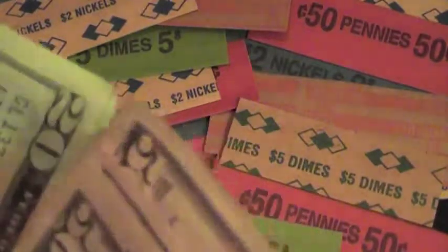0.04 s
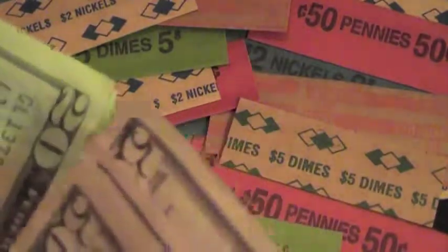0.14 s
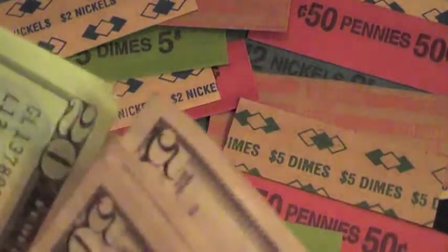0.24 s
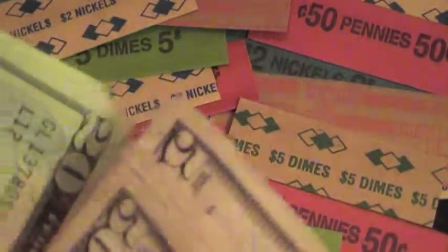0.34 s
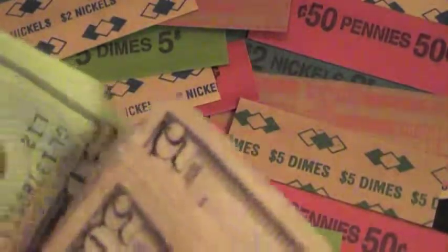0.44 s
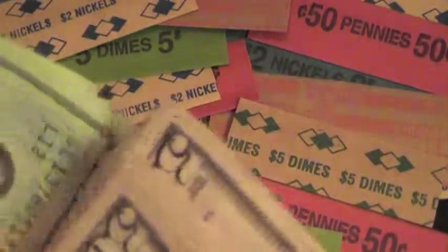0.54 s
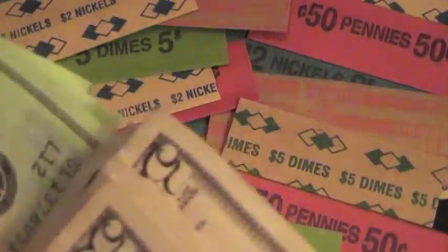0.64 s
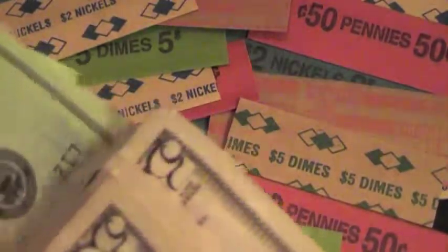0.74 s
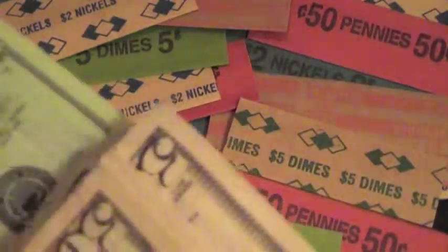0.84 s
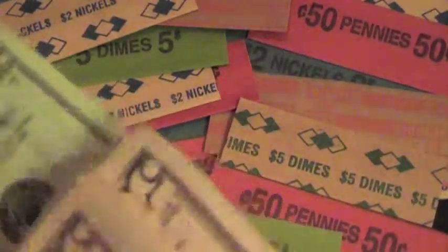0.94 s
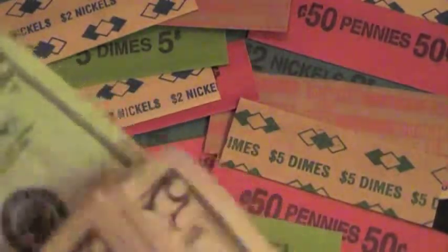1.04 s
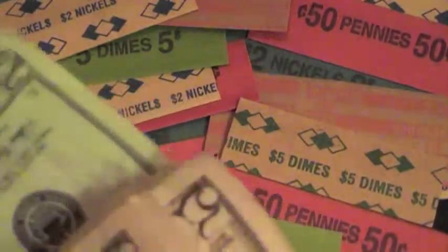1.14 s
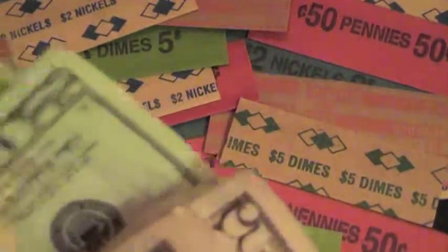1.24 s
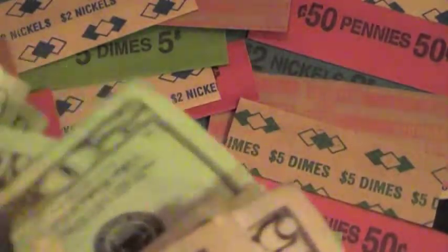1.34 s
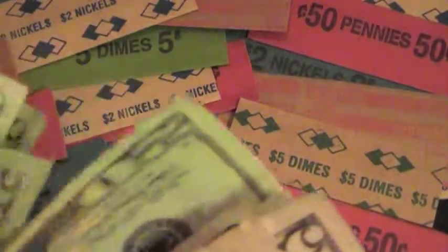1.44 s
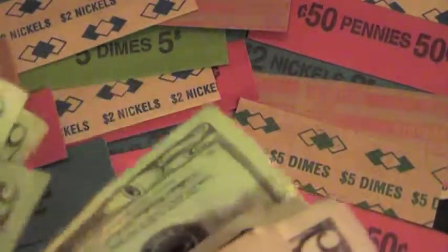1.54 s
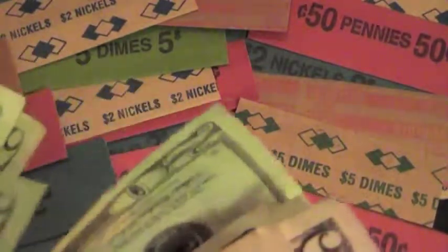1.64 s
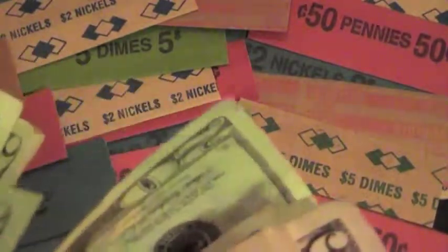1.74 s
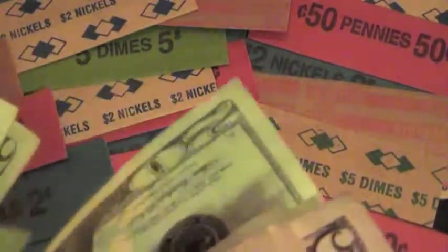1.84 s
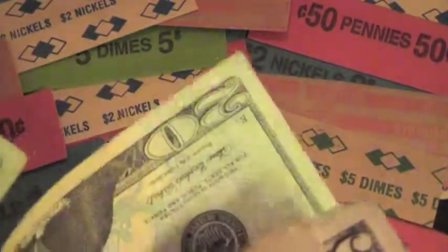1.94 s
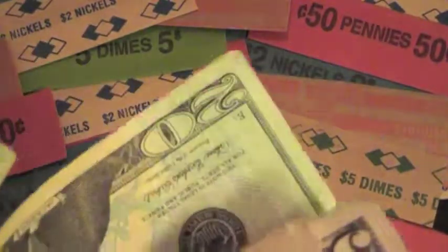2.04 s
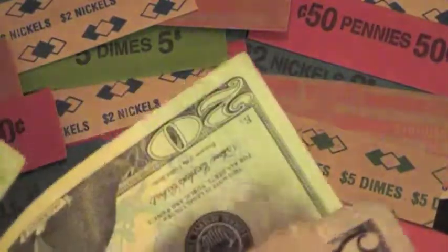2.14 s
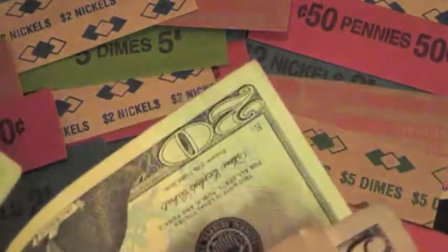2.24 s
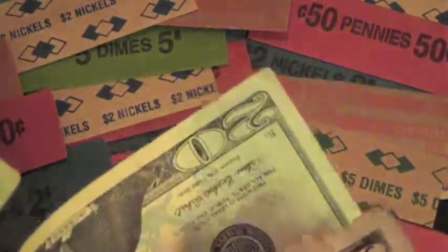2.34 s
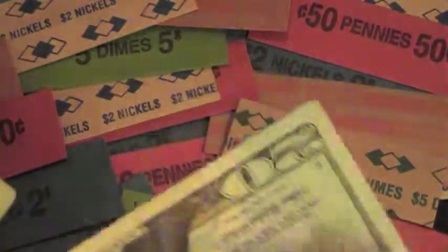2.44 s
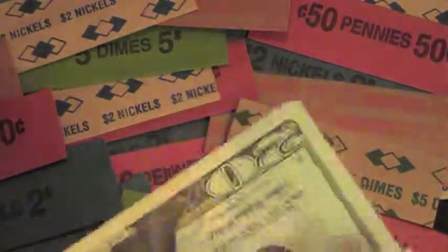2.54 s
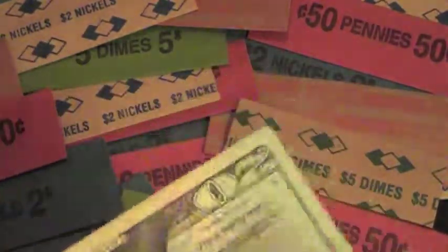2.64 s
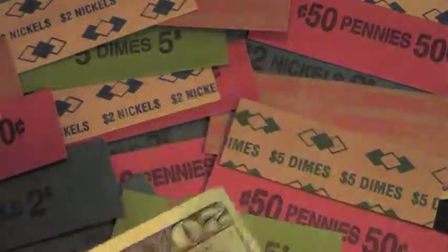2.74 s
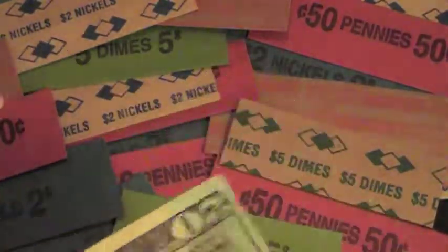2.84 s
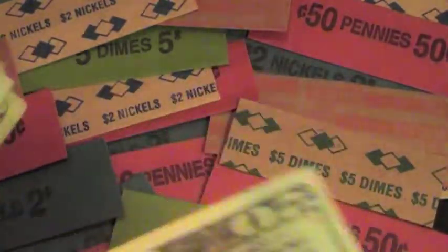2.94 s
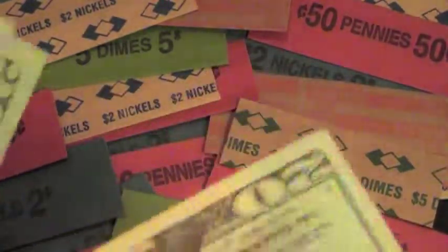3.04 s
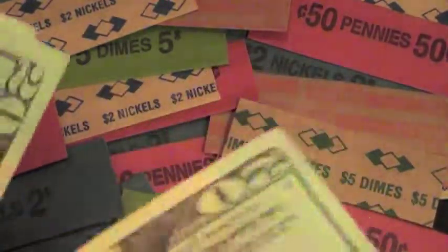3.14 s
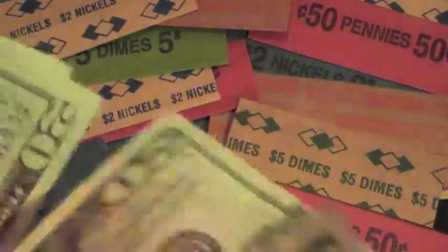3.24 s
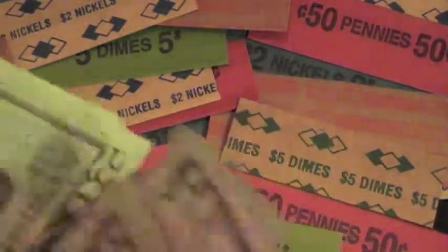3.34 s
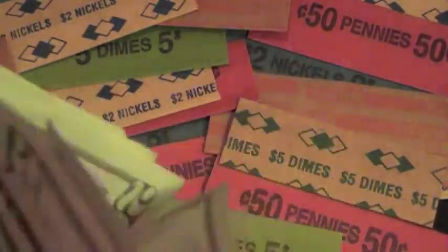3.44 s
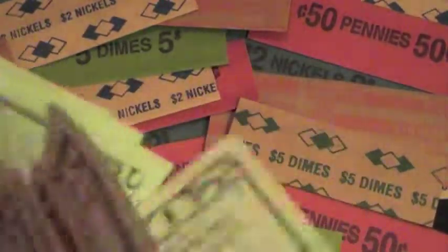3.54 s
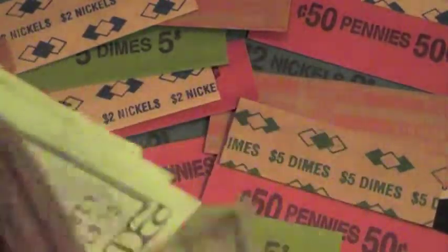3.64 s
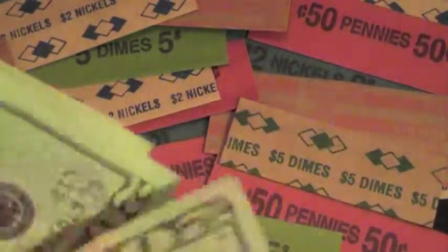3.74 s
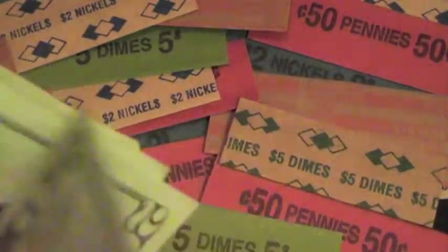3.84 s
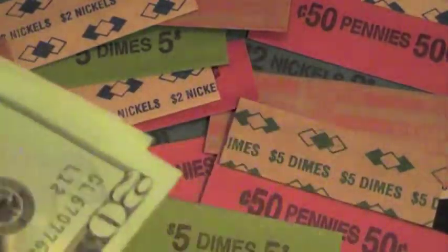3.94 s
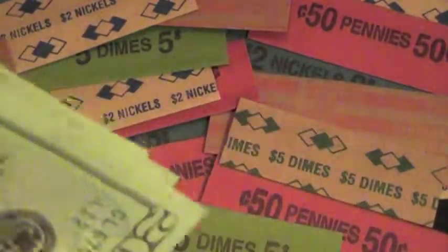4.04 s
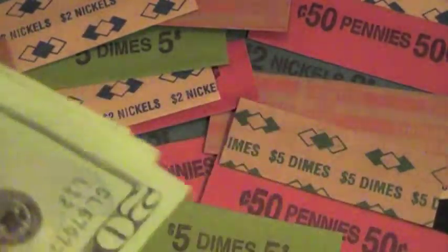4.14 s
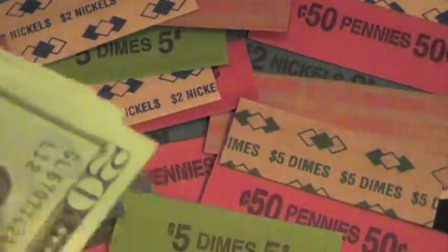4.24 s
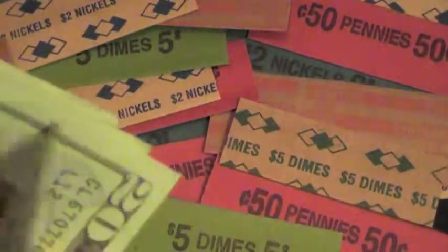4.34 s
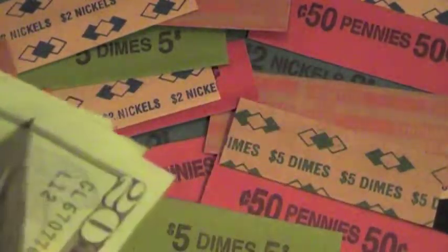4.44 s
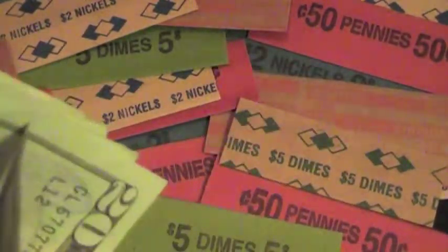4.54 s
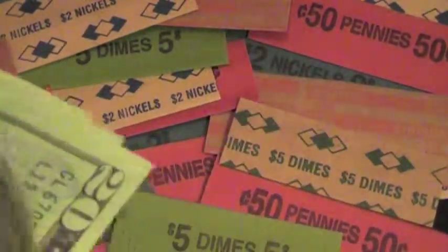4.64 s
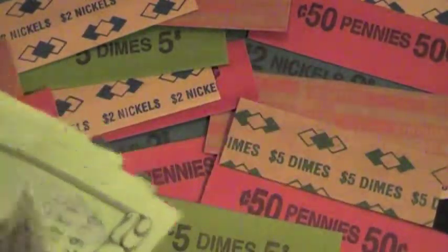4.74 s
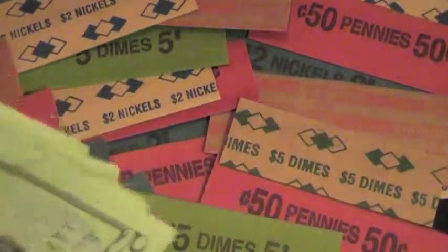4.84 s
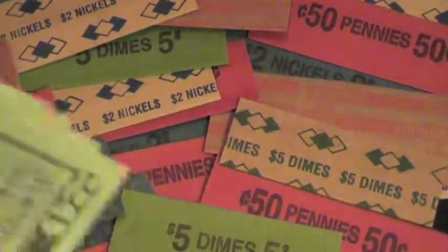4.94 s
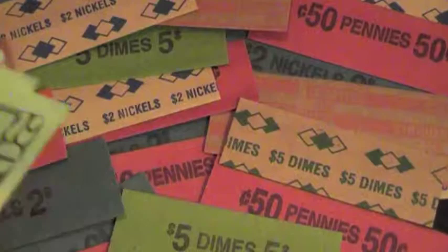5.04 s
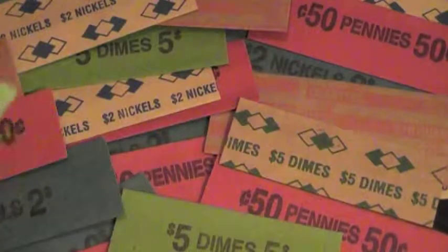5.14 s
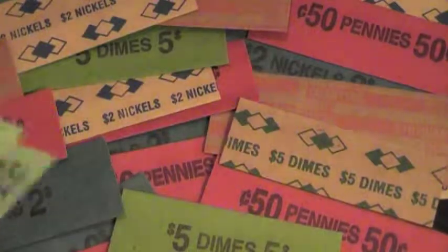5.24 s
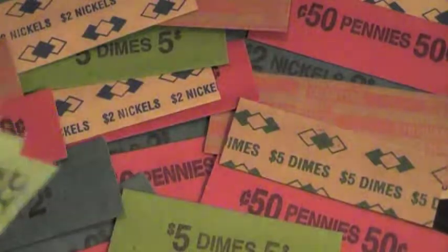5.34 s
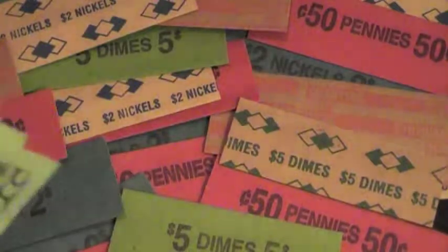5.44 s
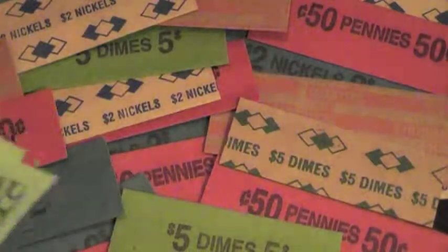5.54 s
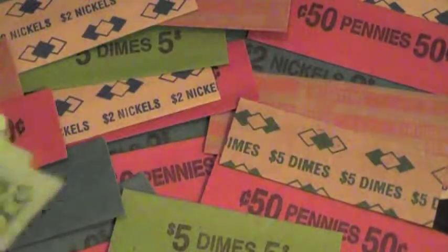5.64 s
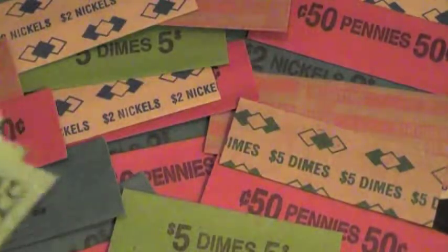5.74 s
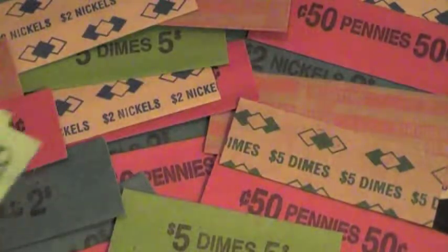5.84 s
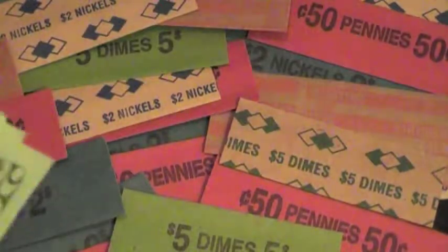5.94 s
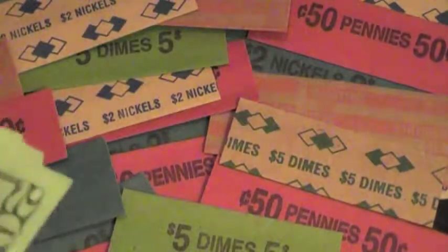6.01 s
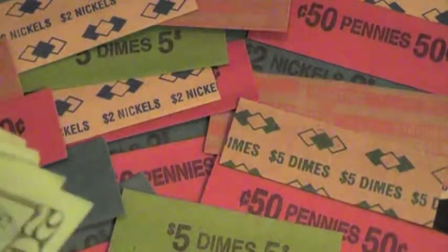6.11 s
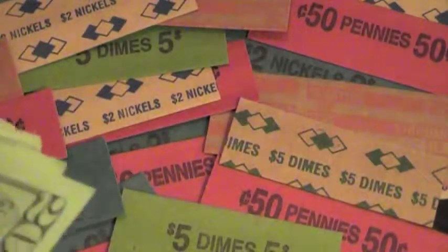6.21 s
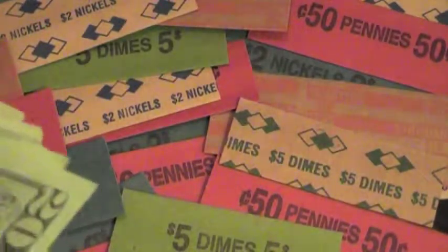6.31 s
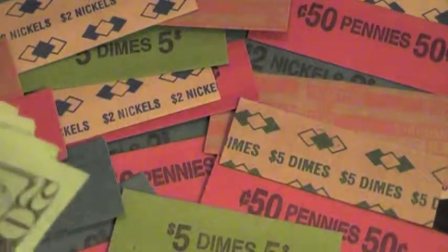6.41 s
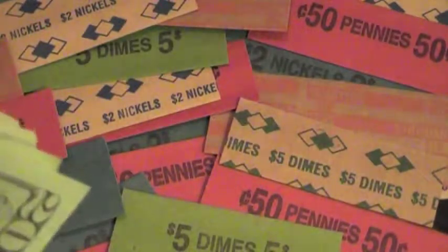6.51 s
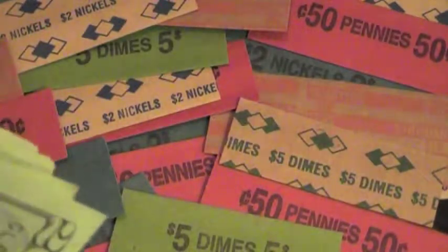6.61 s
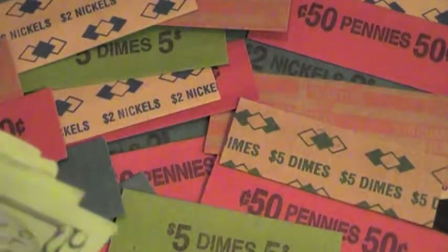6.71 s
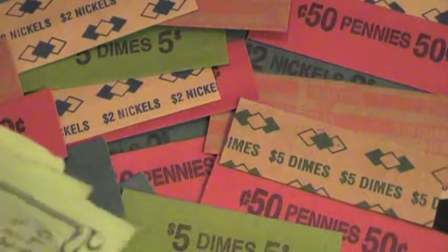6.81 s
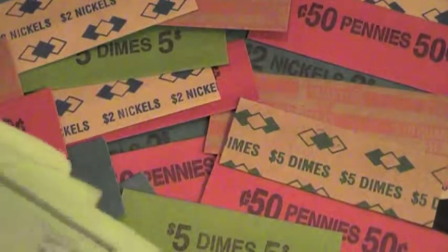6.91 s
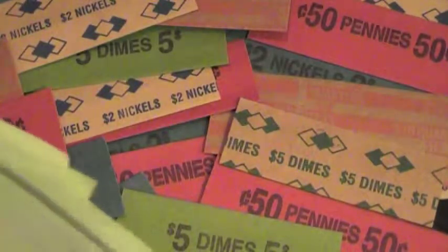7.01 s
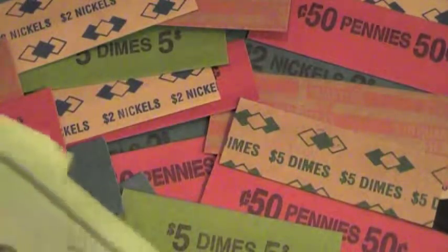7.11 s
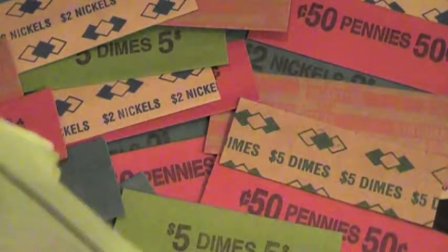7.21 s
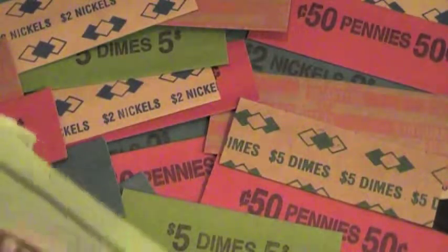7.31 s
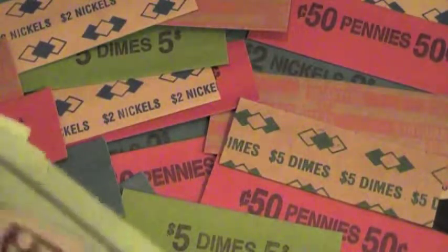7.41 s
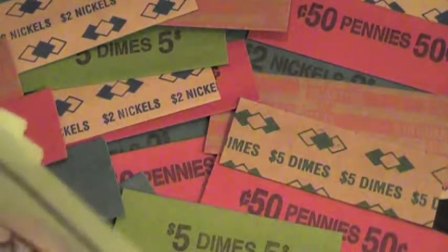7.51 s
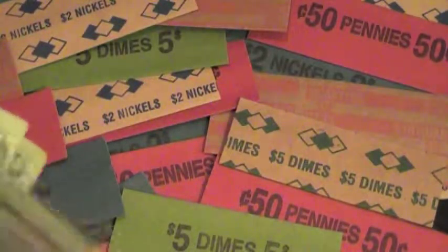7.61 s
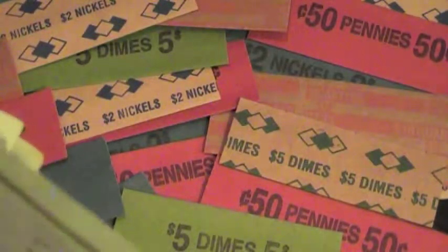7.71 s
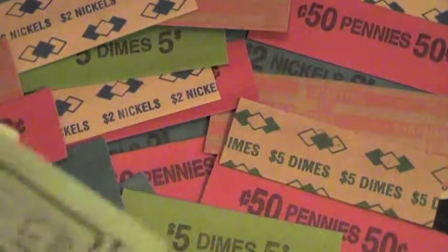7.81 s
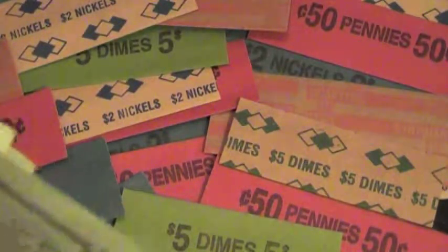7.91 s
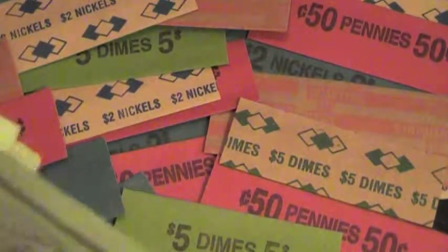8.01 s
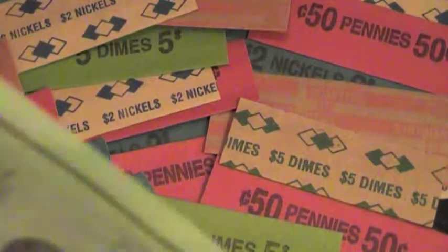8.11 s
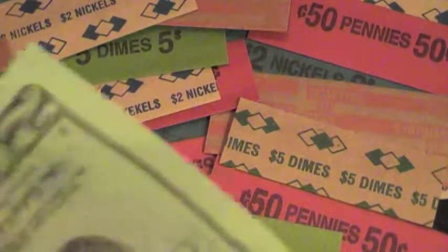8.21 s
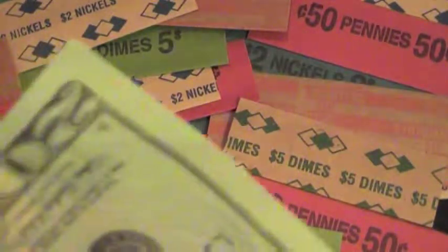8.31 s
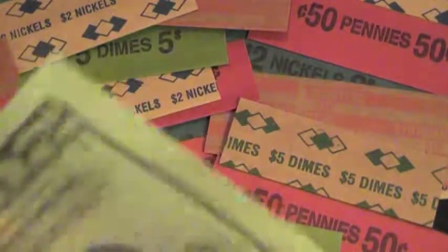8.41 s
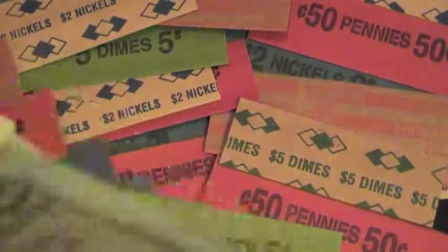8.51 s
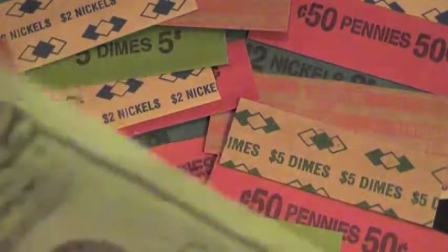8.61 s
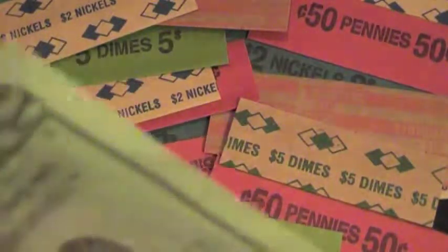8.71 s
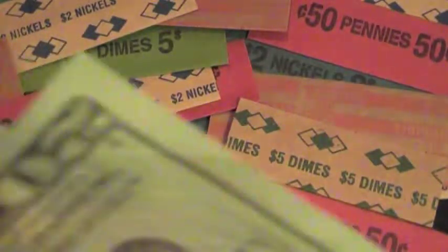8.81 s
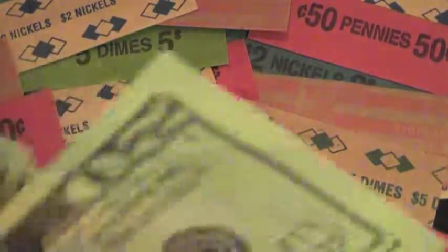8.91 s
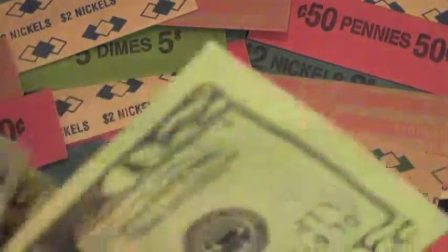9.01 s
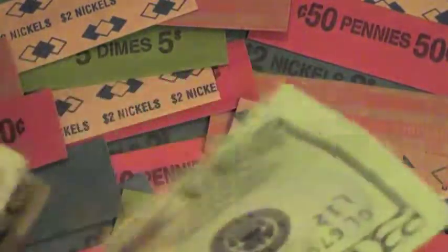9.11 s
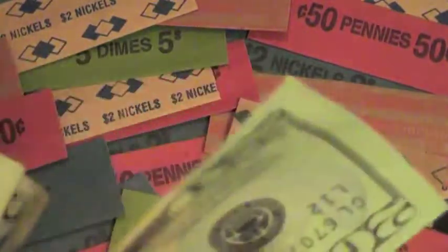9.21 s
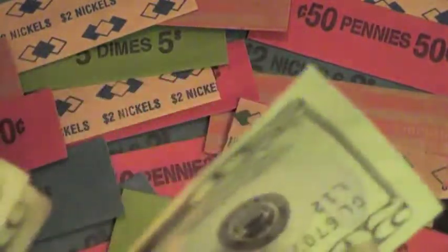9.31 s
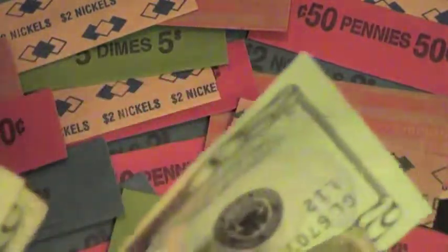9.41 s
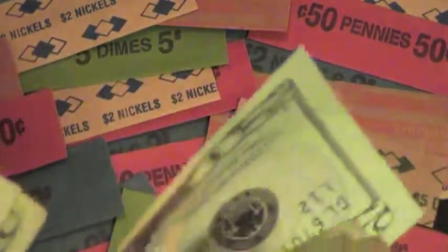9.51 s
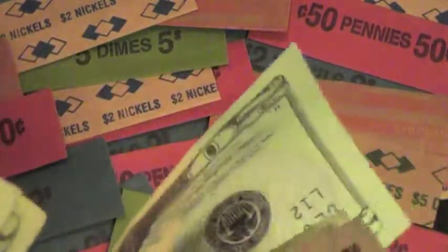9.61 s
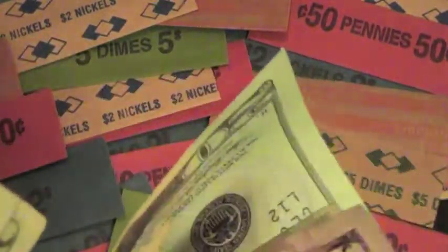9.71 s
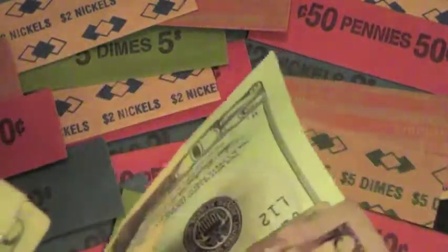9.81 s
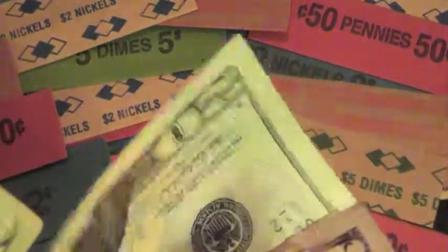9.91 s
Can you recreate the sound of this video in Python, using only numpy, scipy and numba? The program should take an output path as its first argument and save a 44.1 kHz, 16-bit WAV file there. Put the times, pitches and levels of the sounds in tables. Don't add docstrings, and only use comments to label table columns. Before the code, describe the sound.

Banknotes are peeled and pulled one by one, loud papery pops breaking up quieter hissing rubs, in a furnished room with faint hum.

```python
import sys
import numpy as np
from scipy import signal
from scipy.fft import rfft, irfft, next_fast_len
from scipy.io import wavfile
from scipy.ndimage import uniform_filter1d
from numba import njit

SR = 44100
rng = np.random.default_rng(int(sys.argv[2]) if len(sys.argv) > 2 else 0)


def voltage_ratio(level):
    return 10 ** (np.asarray(level, float) / 20)


def generate_wav(sig):
    pcm = np.round(np.clip(np.atleast_2d(sig).T, -1, 1) * 32767).astype(np.int16)
    wavfile.write(sys.argv[1], SR, pcm)


N = 439236

# start_s, sheet_level_db, fall_s (per 20 dB), hiss_above_sheet_db
FLICKS = [(3.122, -36.5, 0.05, -12), (3.96, -48, 0.07, -1.5), (4.15, -45, 0.15, -1.5),
          (4.451, -42.5, 0.07, -1.5), (4.661, -48.5, 0.14, -1.5), (5.333, -40, 0.13, 0.5),
          (6.137, -43, 0.08, 1), (6.64, -48, 0.24, 0.5), (7.588, -38, 0.2, -14.5),
          (7.718, -42.5, 0.15, -3.5), (7.66, -50, .5, 0), (8.846, -42, 2, -7), (9.552, -31, 0.15, -4.5),
          (9.692, -34, 0.0223, -7.5), (9.947, -29.5, -1, -11.5)]
FLICK_RISE_S = 0.014
# peak_s, sheet_level_db, rise_s (per 20
# dB), fall_s (per 20 dB), hiss_above_sheet_db
DRAGS = [(0.043, -46, 0.0367, 0.0217, -3), (.106, -56, 0.069, .04, -2), (.659, -60, 0.43, .4, 2),
         (0.956, -44, 0.257, 0.11, -3), (1.3, -50.5, 0.21, 0.35, 4.5), (1.469, -36.5, 0.25, 0.29, -3.5),
         (1.542, -32.5, 0.17, 0.081, -12), (1.6, -40.5, 0.127, 0.18, -11),
         (1.802, -37.5, 0.35, 0.059, -11), (1.89, -38, .05, .3, -19), (1.962, -33, 0.27, .2, -10),
         (1.997, -24.5, 0.087, .1, -8), (2.04, -30, 0.1, 0.11, 4), (2.083, -26.5, .15, 0.078, -16),
         (2.131, -37.5, .1, 0.237, -18), (2.265, -33, 0.063, 0.1495, -7),
         (2.456, -34.5, 0.191, 0.25, -10), (2.485, -31, 0.044, 0.04, -2), (2.54, -37, .1, 0.083, -10),
         (2.682, -45, 0.44, 0.072, -8), (2.895, -43.5, 0.3, .4, -1.5), (3.052, -39, 0.2, 0.21, -4.5),
         (3.207, -39, 0.079, 0.084, -12.5), (3.38, -46, 0.396, 0.675, -8),
         (3.49, -44, 0.37, 0.14, 3.5), (3.79, -44.5, 0.13, 0.12, -3), (4.2, -52, 0.054, 0.37, -5.5),
           (4.005, -50, .1, .1, 0), (4.428, -51, .05, .1, 0), (4.857, -41.5, 0.062, 0.067, 1),
           (4.958, -43.5, 0.164, 0.215, 4), (5.086, -36.5, 0.09, 0.287, 10),
           (5.196, -40.5, 0.412, 0.12, 5.5), (5.39, -45.5, 0.11, 0.084, 4.5),
           (5.593, -52, 0.23, 0.11, -2.5), (5.775, -48.5, 0.16, 0.038, -2), (5.881, -49, 0.096, 0.155, 1.5),
           (5.96, -54, 0.257, 0.172, 4.5), (6.19, -44, 0.093, 0.062, -3), (6.306, -50, 0.097, 0.16, 4.5),
           (6.499, -47.5, 0.2, 0.089, .5), (6.763, -52.5, 0.04, 0.54, 0), (7.004, -45.5, 0.12, 0.119, 4.5),
           (7.142, -52.5, 0.063, 0.59, 4.5),
         (7.445, -37, 0.059, 0.15, -4), (7.475, -43.5, 0.14, 0.49, 1), (7.872, -43.5, 0.096, 0.125, 1.5),
           (8.249, -37, 0.16, 0.36, -5), (8.405, -38.5, 0.32, 0.022, -6), (8.549, -43.5, 0.072, .3, -9),
           (8.66, -43, 0.345, 0.11, 0), (8.694, -34.5, 0.049, 0.055, -8.5), (8.932, -38, 0.3, 0.23, -5),
           (8.968, -33, 0.17, 0.207, -14.5), (9.057, -42, 0.098, 0.113, -7.5),
           (9.179, -33, 0.056, 0.31, -11.5), (9.235, -31, 0.16, 0.132, -17), (9.357, -41.5, 0.14, 0.53, -4),
           (9.427, -36.5, 0.28, 0.13, -10), (9.824, -43, 0.044, 0.03, -9)]
# start_s, length_s, sheet_level_db, hiss_above_sheet_db
SWIPES = [(2.006, .003, -19, -14), (2.474, .008, -31.5, 0), (2.49, 0.0064, -25, -7.5),
          (2.508, .005, -29.5, -8), (3.724, 0.042, -34, -2), (3.946, 0.015, -40, 1.5),
          (4.135, 0.02, -36.5, 1.5), (4.447, .012, -44, -3), (5.066, .05, -39, 8), (5.18, .026, -39, 7.5),
          (5.325, .01, -40.5, 2), (6.091, .004, -59, 4), (6.145, 0.0054, -34, 2.5), (6.169, .03, -44.5, -1),
          (7.408, .03, -33.5, -2.5), (8.232, 0.028, -36.5, -6.5), (8.69, 0.0096, -28.5, -10),
          (9.228, .015, -31, -14), (9.814, 0.023, -42.5, -9.5)]
SWIPE_RISE_S, SWIPE_FALL_S = 0.012, 0.017
LINGER_DB, LINGER_S = -24.5, 0.22
HELD_DB, HELD_HISS_DB = -72, 8
# middle_s, length_s
PAUSES = [(1.853, 0.0432), (2.227, 0.0576), (2.594, 0.058), (3.697, 0.055), (4.91, 0.0423), (5.265, 0.1),
          (5.796, 0.022), (8.06, 0.149), (8.474, 0.097), (8.787, 0.08), (9.119, 0.061), (9.325, 0.048),
          (2.36, .03), (3.89, .07), (4.085, .05), (6.07, .06)]
PAUSE_DB, PAUSE_HISS_SHARE = -6.5, 0.5
PINNED_S, PINNED_DB = 0.056, -5.5

# time_s, pitch_hz
TAUT_PITCH = [(0, 1840), (.55, 1480), (1.1, 1620), (3.6, 2100), (3.75, 2000), (4.1, 2520), (4.3, 2300),
              (4.46, 1601), (4.86, 1990), (5.1, 2400), (5.7, 2200), (6.15, 2200), (6.4, 2130), (6.7, 1900),
              (7.2, 2200)]
# time_s, pitch_hz
BENT_PITCH = [
    [(1.25, 1570), (1.298, 1870), (1.34, 1360), (1.586, 1720), (1.692, 2210), (1.766, 1470), (1.85, 1350)],
    [(1.86, 1270), (2.066, 1790), (2.328, 1510), (2.358, 1250), (2.47, 1730), (2.572, 1550), (2.6, 1210)],
    [(2.8, 1910), (2.928, 2110), (2.998, 1460), (3.252, 1010), (3.338, 2160), (3.378, 1570), (3.45, 2340)],
    [(7.36, 2700), (7.454, 2660), (7.556, 1680), (7.818, 1430), (7.846, 1920), (7.916, 2300), (7.95, 1640)],
    [(8.12, 1410), (8.232, 2080), (8.3, 1250), (8.398, 1670), (8.478, 1090), (8.524, 2080), (8.78, 1270)],
    [(8.8, 1300), (8.86, 1350), (8.916, 2090), (8.988, 2210), (9.03, 1640), (9.182, 1620), (9.3, 994)],
    [(9.33, 2350), (9.542, 1490), (9.636, 1750), (9.662, 1470), (9.748, 1720), (9.874, 1580), (9.9, 1300)],
]
TAUT_DB_PER_HISS_DB = 0.1
# time_s, pitch_hz
CONTACT_PITCH = [
    [(0.0, 7320), (0.554, 7280), (0.588, 8680), (0.834, 6420), (1.118, 5600), (1.2, 7940)],
    [(1.25, 7990), (1.322, 8700), (1.382, 8560), (1.696, 5010), (1.752, 6460), (1.85, 6690)],
    [(1.9, 6580), (2.208, 5070), (2.238, 8250), (2.388, 6040), (2.504, 8070), (2.6, 5740)],
    [(2.65, 7530), (2.684, 5430), (2.802, 7650), (3.138, 5580), (3.528, 7410), (3.6, 6910)],
    [(3.7, 8450), (3.892, 6430), (3.946, 8900), (4.066, 5460), (4.08, 6960), (4.7, 7510)],
    [(4.75, 8170), (4.886, 7530), (5.156, 8870), (5.288, 6050), (5.388, 8700), (5.45, 6910)],
    [(5.5, 7330), (5.9, 6450), (5.938, 9480), (6.062, 5870), (6.094, 9570), (6.35, 5870)],
    [(6.4, 5880), (6.556, 7760), (6.632, 5160), (6.664, 5910), (7.208, 7630), (7.3, 6970)],
    [(7.36, 5680), (7.5, 5780), (7.556, 8680), (7.736, 5600), (7.816, 7620), (7.97, 6130)],
    [(8.12, 6400), (8.2, 8530), (8.316, 4630), (8.34, 6410), (8.728, 8950), (8.78, 6650)],
    [(8.82, 8220), (8.88, 8820), (8.968, 8840), (9.022, 5630), (9.082, 7370), (9.3, 5120)],
    [(9.34, 6660), (9.446, 5590), (9.546, 6480), (9.626, 5930), (9.738, 6510), (9.96, 6120)],
]
# pitch_hz, level_db (per Hz)
SHEET_COLOUR = [(150, -29), (400, -3.5), (800, 0.5), (1500, -2), (3000, -2), (4400, -7), (7000, -35)]
FIBRE_COLOUR = [(2500, -1.5), (4500, -1.5), (5800, -0.5), (7000, -4), (8900, -1.5), (11500, -5),
                (13500, -14), (16500, -14.5)]

# snap_s, peak_db, patch_pitch_hz, crack_above_peak_db
TIGHT = [(.602, -29, 1710, -5.5), (1.0308, -30, 3180, -14.5), (1.0948, -27, 1210, -23),
         (1.5463, -9.5, 1620, -13.5), (1.6742, -1.5, 2240, -35), (2.0042, -8, 2500, 7),
         (2.0145, 1.5, 1600, -26.5), (2.043, 0.5, 2820, -1), (3.052, -5, 1240, -12.5),
         (3.1872, -21, 1370, -21.5), (4.6643, -30.5, 1820, -6.5), (6.8592, -23.5, 3807, -2),
         (6.8765, -34, 1580, 1.5), (7.711, -27, 1300, -25), (7.7177, -20, 1230, 3.5),
         (7.884, -19, 1660, -5), (8.3068, -12.5, 2320, -16), (8.3779, -16.5, 2060, -20),
         (8.5224, -28.5, 2250, -13), (8.8342, -20.5, 828, -6.5), (8.9405, -17, 2300, -23),
         (8.9441, -3, 2114, 2), (7.4055, 0, 2494, -13), (8.962, -6.5, 2700, -7.5),
         (9.1415, -29.5, 1230, -6.5), (9.1897, -15, 2410, -36), (9.2225, -1, 1900, -9),
         (9.353, -6.5, 2600, -7.5), (9.552, -7, 1296, -4.5), (9.6278, -13, 1760, -33.5),
         (9.6554, -19.5, 1297, -26), (9.9462, -3.5, 2090, -42)]
HALF_FREE = [(1.1016, -25, 2380, -25), (1.1678, -21, 1350, -17), (2.4848, -12, 1700, 0),
             (2.084, -1.5, 1960, -14), (3.0437, -18.5, 2020, -16), (3.1792, -15, 1750, -27),
             (4.855, -28, 2100, -3.5), (5.326, -27, 2300, -2), (5.7301, -21, 2180, -8),
             (6.4636, -35, 1780, -13), (6.6428, -24.5, 2410, -12), (6.7582, -26, 2080, -13),
             (6.8161, -31.5, 1525, -5), (6.8454, -34.5, 1770, -0.5), (7.3824, -27, 2470, -8),
             (7.5768, -7, 1700, -5), (7.8989, -17.5, 3660, -4), (8.1476, -25, 1450, -15),
             (8.3139, -18.5, 1213, -13), (8.7626, -25.5, 1144, -34), (9.4285, -11, 2145, -13.5),
             (9.554, -8.5, 1534, -15), (9.624, -16.5, 1740, -28)]
LOOSE = [(.0659, -27.5, 2450, -5), (.6614, -29, 2414, -5.5), (1.1142, -27, 1313, -22),
         (2.0774, -4.5, 1500, -6), (2.2464, -23.5, 2670, -9), (2.2516, -27.5, 533, -2.5),
         (2.6854, -21.5, 2156, -24), (2.7379, -31.5, 3060, -21.5), (2.8942, -24, 1900, -5),
         (3.1219, -26, 460, -8.5), (3.1267, -16, 2560, -15.5), (3.166, -20, 1460, -22.5),
         (3.1732, -23, 690, -24.5), (3.2036, -22.5, 563, -29.5), (3.2326, -28.5, 630, -15),
         (3.362, -26.5, 2200, -10.5), (3.3788, -29.5, 1770, -17), (3.3836, -24, 1680, -9.5),
         (4.4397, -29.5, 1700, -26), (4.8918, -33, 2260, -14), (6.6783, -34, 633, -3),
         (7.272, -31, 3470, -16), (7.3091, -27.5, 2740, -13), (7.44, -18, 3670, -0.5),
         (8.004, -37, 610, -29.5), (8.6886, -16.5, 1530, 4), (8.6925, -19, 1600, -25),
         (9.0252, -29, 746, -21)]
# snap_s, peak_db, patch_pitch_hz,
# crack_above_peak_db
FURTHER_SNAPS = [(1.36, -30.5, 1100, -20), (1.4495, -22, 2600, -20), (1.522, -22, 1700, -20),
                 (1.5435, -17.5, 1500, -7), (1.864, -28.5, 1070, -12), (1.9765, -15, 1350, -20),
                 (2.0045, -2.5, 5300, -12), (2.0435, -6, 1300, -15), (2.387, -30, 1700, -10), (2.625, -32, 930, -8),
                 (3.1185, -27, 600, -12), (3.156, -30, 1200, -20), (3.229, -29, 2300, -18), (3.575, -37, 1750, -8),
                 (3.662, -39, 1594, -14), (3.677, -36, 2500, -9), (4.4465, -28.5, 1500, -8),
                 (4.593, -40, 1530, -13), (4.654, -37, 3220, -8), (4.778, -36, 2080, -5), (5.959, -35, 3500, 2),
                 (6.1365, -27, 1820, -3), (6.954, -34, 2610, -8), (6.959, -27, 4230, -10), (7.328, -36, 1490, -10),
                 (7.4065, -4, 3400, -16), (8.112, -39.5, 1130, -3), (8.3075, -18.5, 706, -19),
                 (8.544, -29, 2380, -12), (8.596, -31, 2370, -6), (8.803, -37, 1730, -6), (8.901, -25, 1450, -8),
                 (9.172, -24, 1570, -16), (9.2235, -5, 755, -25), (9.482, -27.5, 2100, -10), (9.539, -33, 1500, -6),
                 (9.9425, -23, 3000, -6)]
TIGHT_FLAP_DB, HALF_FREE_FLAP_DB, LOOSE_FLAP_DB, FURTHER_FLAP_DB = -21, -15.5, -5, -17.5
# pitch_hz, level_db
PATCH_COLOUR = [(60, -49), (150, -19.5), (400, -7.5), (700, -3), (20000, 10)]
# pitch_hz, level_db (per Hz)
CRACK_COLOUR = [(2500, -2), (4500, -1.5), (6000, -1.5), (9500, -0.5), (12000, -9.5), (16500, -36)]

# pitch_hz, level_db
HOUSING = [(10, -2), (3500, 0.5), (4400, -3.5), (5300, 0.5), (22050, 1.5)]
# pitch_hz,
# level_db
PORT_DIFFERENCE = [(10, -6.5), (1200, -17), (3500, 1.5), (7000, 2), (11000, 5), (22050, 9)]
PORT_LAG_US, PORT_WANDER_US = 11.8, 4.5

# pitch_hz, time_to_fall_60_db_s
ROOM_RING = [(200, 1), (1500, 0.32), (5000, 0.35), (12000, 0.244)]
ROOM_DB, ROOM_GAP_S = -12, 0.0024
# pitch_hz, side_relative_to_mid_db
ROOM_DIFFERENCE = [(200, -12), (1200, -20), (5000, -6), (14000, 2.5)]

# pitch_hz, level_db (per Hz)
QUIET_COLOUR = [(18, -34.5), (30, -28), (161, 6), (394, -3), (499, -7), (649, -2.5), (721, -7.5),
                (844, -10.5), (1070, -11.5), (2350, -12), (4650, -18), (8740, -24), (13000, -45.5),
                (16000, -27)]
QUIET_DB = -56
# pitch_hz, level_db
HUM = [(49, -72.5), (72, -72), (120, -63), (840, -72.5)]


def sliding():
    t = np.arange(N) / SR
    sheet_db, hiss_db = strokes(t)
    pitch_points = TAUT_PITCH + [tuple(point) for note in BENT_PITCH for point in note]
    sheet_hz = np.interp(t, *np.transpose(sorted(pitch_points)))
    sheet_hz = sheet_hz * voltage_ratio(TAUT_DB_PER_HISS_DB * hiss_db)
    stroke_db = sheet_db + 0.85 * walk(70)
    sheet_hz = 1800 * (sheet_hz / 1800) ** 1.04 * voltage_ratio(0.87 * walk(25))
    contact_hz = np.interp(t, *np.vstack(CONTACT_PITCH).T)
    contact_hz = 7500 * (contact_hz / 7500) ** 1.7

    sheet = colour(slips(scatter_db=3.0, flicker_db=2.0, rate=150), SHEET_COLOUR)
    fibre = colour(slips(scatter_db=2.5, flicker_db=1.5, rate=200), FIBRE_COLOUR)
    sheet = resonance(sheet, sheet_hz, 1.07) + voltage_ratio(-13) * sheet
    fibre = resonance(fibre, np.minimum(contact_hz, 14000.), 0.9) + voltage_ratio(-18.0) * fibre
    return voltage_ratio(stroke_db) * (unit(sheet) + voltage_ratio(hiss_db) * unit(fibre))


def strokes(t):
    rows = [(s, db, FLICK_RISE_S, fall, hiss) for s, db, fall, hiss in FLICKS]
    rows = [(*row, 0) for row in rows + DRAGS]
    rows += [(s, db, SWIPE_RISE_S, SWIPE_FALL_S, hiss, hold) for s, hold, db, hiss in SWIPES]
    at, peak_db, rise, fall, hiss_db, hold = (c[:, None] for c in np.transpose(rows))
    ms = np.arange(0, t[-1], 0.001)
    before = np.maximum(at - ms, 0)
    after = np.maximum(ms - at - hold, 0)
    falling = voltage_ratio(-20 * after / fall) + voltage_ratio(LINGER_DB - 20 * after / LINGER_S)
    size = voltage_ratio(peak_db - 20 * before / rise) * falling
    sheet = (size ** 4).sum(axis=0) + voltage_ratio(HELD_DB) ** 4
    fibre = ((size * voltage_ratio(hiss_db)) ** 4).sum(axis=0) + voltage_ratio(HELD_DB + HELD_HISS_DB) ** 4
    sheet_db = 5 * np.log10(sheet)
    hiss_db = 5 * np.log10(fibre / sheet)

    still_db = np.zeros(len(ms))
    for middle, length in PAUSES:
        still_db += PAUSE_DB * np.clip(2 - np.abs(ms - middle) / (length / 3), 0, 1)
    for start, *_ in FLICKS:
        wait = start - FLICK_RISE_S - ms
        still_db += PINNED_DB * np.clip(1 - wait / PINNED_S, 0, 1) * (ms < start - FLICK_RISE_S)
    return np.interp(t, ms, sheet_db + still_db), np.interp(t, ms, hiss_db + PAUSE_HISS_SHARE * still_db)


def slips(scatter_db, flicker_db, rate):
    kick_db = scatter_db * np.minimum(rng.exponential(size=N), 6)
    kicks = rng.standard_normal(N) * voltage_ratio(kick_db)
    return kicks * voltage_ratio(flicker_db * walk(rate))


def snaps(kinds):
    rows = sorted((*row, flap_db) for table, flap_db in kinds for row in table)
    at, peak_db, patch_hz, crack_db, flap_db = (c[:, None] for c in np.transpose(rows))
    lead, length = 128, 1024
    t = np.maximum(np.arange(length) - lead + 24, 0) / SR
    chance = rng.random((len(rows), 8))
    grit = rng.standard_normal((len(rows), length))
    rise = 1 - np.exp(-(t / 0.00034) ** 2)

    modes = [(1, 0, 1.3), (.6, -7, 1.0), (1.5, -2, 1.7), (2.3, -5, 2.4)]
    patch = 0
    for k, (ratio, db, cycles) in enumerate(modes):
        hz = patch_hz * ratio * (1 + 0.23 * k * (chance[:, [k]] - .5))
        level = voltage_ratio(db + 0.32 * crack_db * (ratio > 1))
        wave = np.sin(2 * np.pi * (hz * t + chance[:, [4 + k]]))
        patch = patch + level * wave * np.exp(-hz * t / cycles)
    patch = unit(colour(patch * rise, PATCH_COLOUR))
    scale = voltage_ratio(peak_db) / np.abs(patch).max(axis=1, keepdims=True)

    crack = unit(colour(grit * rise * np.exp(-t / 0.00096), CRACK_COLOUR))
    flap_colour = [(40, -18), (180, -8.0), (550, -1.0), (800, -3.5), (1200, -48.5)]
    flap = unit(colour(grit[::-1] * rise * np.exp(-t / 0.0049), flap_colour))
    every_snap = scale * (patch + voltage_ratio(crack_db) * crack + voltage_ratio(flap_db) * flap)
    out = np.zeros(N + length)
    for s, snap in zip(at[:, 0], every_snap):
        i = max(int(s * SR) - lead, 0)
        out[i:i + length] += snap
    return out[:N]


def port_difference(paper):
    lag_us = PORT_LAG_US + PORT_WANDER_US * walk(42)
    return lag_us / 1850000.0 * SR * np.gradient(colour(paper, PORT_DIFFERENCE))


def room(x):
    t = np.arange(SR // 3) / SR
    tail = 0
    for k, (_, ring_s) in enumerate(ROOM_RING):
        band = [(hz, 0 if j == k else -30) for j, (hz, _) in enumerate(ROOM_RING)]
        noise = colour(rng.standard_normal((2, len(t))), [(30, -19)] + band)
        tail = tail + noise * np.exp(-np.log(1000) * t / ring_s)
    tail = tail * np.clip(t / ROOM_GAP_S - 1, 0, 1)
    tail = voltage_ratio(ROOM_DB) * tail / np.sqrt(np.sum(tail[0] ** 2))
    mid, side = signal.fftconvolve(x[None], tail, axes=1)[:, :N]
    return mid, colour(side, ROOM_DIFFERENCE)


def quiet():
    t = np.arange(N) / SR
    noise = unit(colour(rng.standard_normal((2, N)), QUIET_COLOUR))
    mid, side = voltage_ratio(QUIET_DB + 0.88 * walk(2.96)) * noise
    waver = walk(6)
    for k, (hz, db) in enumerate(HUM):
        level = voltage_ratio(db + 3.5 + 2.18 * np.roll(waver, k * SR))
        drift = 0.32 * np.roll(waver, -k * SR)
        mid = mid + level * np.sin(2 * np.pi * hz * t + drift)
    return mid, colour(side, [(18, -7.5), (60, 2.5), (130, -12.0), (1000, -0.5), (14000, -8.5)])


def colour(x, points):
    n = next_fast_len(x.shape[-1], True)
    hz, db = np.transpose(points)
    log_hz = np.log(np.maximum(np.arange(n // 2 + 1) * SR / n, 1))
    gain = voltage_ratio(np.interp(log_hz, np.log(hz), db, left=-90))
    return irfft(rfft(x, n) * gain, n)[..., :x.shape[-1]]


@njit
def resonance(x, hz, q):
    y, band, low = np.empty(len(x)), 0., 0.
    for i in range(len(x)):
        g = np.tan(np.pi * hz[i] / SR)
        v = (band + g * (x[i] - low)) / (1 + g * (g + 1 / q))
        band, low, y[i] = 2 * v - band, low + 2 * g * v, v / q
    return y


def unit(x):
    return x / np.sqrt(np.mean(x ** 2, axis=-1, keepdims=True))


def walk(rate):
    k = int(SR / rate)
    levels = rng.standard_normal(N // k + 2)
    joined = np.interp(np.arange(N) / k, np.arange(N // k + 2), levels)
    return unit(uniform_filter1d(joined, k))


def scene():
    creases = [(TIGHT, TIGHT_FLAP_DB), (HALF_FREE, HALF_FREE_FLAP_DB), (LOOSE, LOOSE_FLAP_DB)]
    paper = sliding() + snaps(creases) + snaps([(FURTHER_SNAPS, FURTHER_FLAP_DB)])
    paper = colour(paper, HOUSING)
    paper_side = port_difference(paper)
    room_mid, room_side = room(paper)
    quiet_mid, quiet_side = quiet()
    mid = paper + room_mid + quiet_mid
    side = paper_side + room_side + quiet_side
    return np.array([mid + side, mid - side])


def low_pass(x):
    return signal.sosfilt(signal.butter(12, 15830, fs=SR, output="sos"), x)


def record(dry):
    mix = np.clip(dry, -1, 1)
    return low_pass(mix)


dry = scene()
out = record(dry)
generate_wav(out)
```